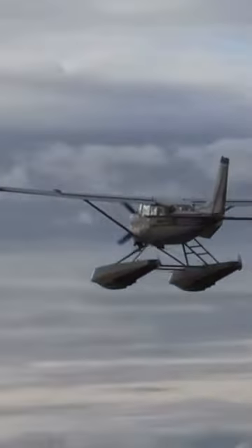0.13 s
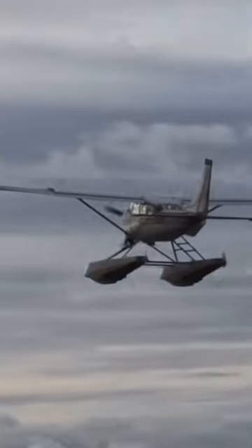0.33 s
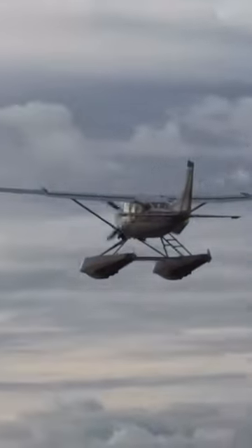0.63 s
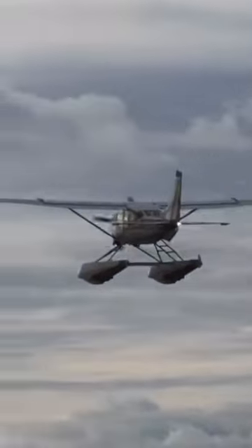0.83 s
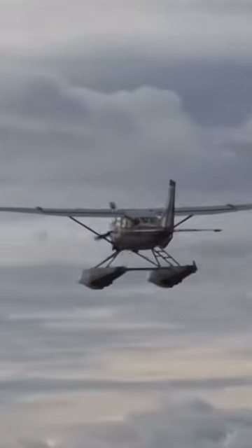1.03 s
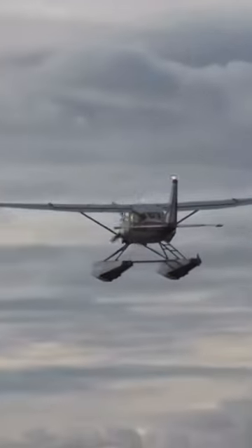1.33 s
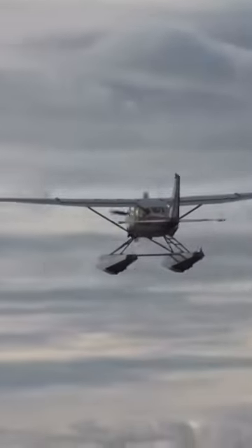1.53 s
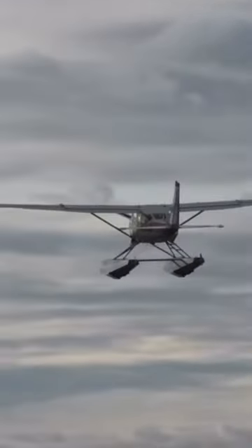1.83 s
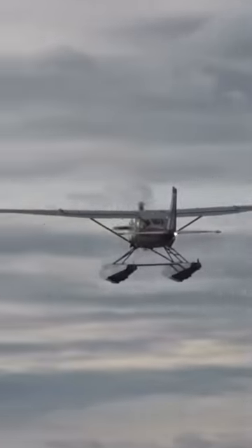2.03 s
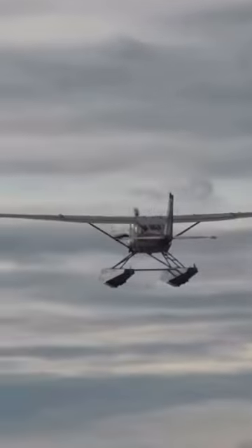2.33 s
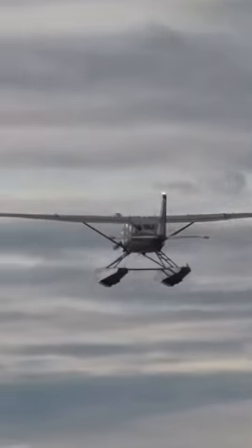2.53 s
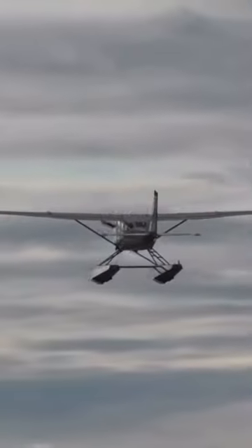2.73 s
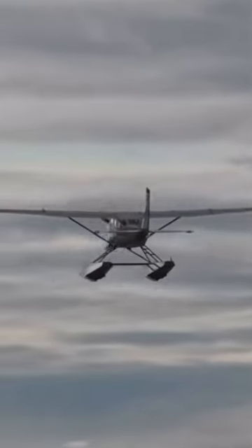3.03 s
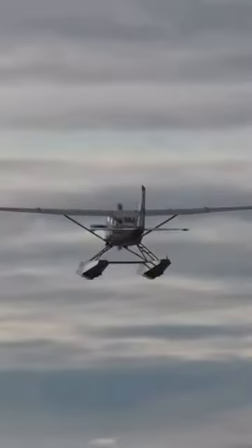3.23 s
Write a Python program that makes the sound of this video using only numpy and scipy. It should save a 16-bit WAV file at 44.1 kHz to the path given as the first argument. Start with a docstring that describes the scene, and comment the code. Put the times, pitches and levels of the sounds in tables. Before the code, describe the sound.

A small propeller plane flies away in the open air. At first close to the microphone, its piston engine barks with a metallic rasp; with distance the treble drops away, leaving a quieter pulsing hum and rushing air.

```python
"""Outdoors, one microphone, just after a float plane with a six-cylinder piston engine has passed.
Close at first, the exhaust booms at the firing rate; every second firing barks and throws a rasping
burst of gas, and propeller wash roars behind. In the first second a few firings crack harder.
Two metallic rings glide in the rasp as the plane turns away. Then distance dulls it all,
leaving mostly the throbbing boom and the wash over a faint hush."""
import sys
import numpy as np
from scipy import signal
from scipy.fft import rfft, irfft, next_fast_len
from scipy.io import wavfile
from scipy.ndimage import uniform_filter1d, map_coordinates

SR = 44100
rng = np.random.default_rng(int(sys.argv[2]) if len(sys.argv) > 2 else 0)


def materialize(psi):
    """Save the field psi as 16-bit PCM at rate SR to the path in sys.argv[1].

    A 1-D psi becomes a single channel; in a 2-D psi each row is a channel.
    """
    bounded = np.clip(np.atleast_2d(psi).T, -1, 1)
    quanta = np.round(bounded * 32767).astype(np.int16)
    wavfile.write(sys.argv[1], SR, quanta)


N = 149058
TIME = np.arange(N) / SR

# The cylinders in firing order. Each row: bark in dB, bark lag in firing intervals, rasp in dB.
CYLINDERS = [(-9, -0.069, -16), (-2, -0.031, 3), (-10.5, -0.0024, -8.5), (-3.5, -0.033, 2.5),
             (-2.5, -0.01, -9), (0.5, -0.034, 3.5)]


def amp(db):
    """Decibels to gain."""
    return 10 ** (np.asarray(db) / 20)


def unit(x):
    """Scale to rms 1."""
    return x / np.sqrt(np.mean(x ** 2) + 1e-20)


def curve(rows, column=1):
    """One column of a time table, per sample."""
    rows = np.array(rows)
    return np.interp(TIME, rows[:, 0], rows[:, column])


def wobble(rate):
    """A smooth random curve, rate knots a second."""
    return map_coordinates(rng.standard_normal(1024), [TIME * rate + 2], mode="wrap")


def along(points, hz):
    """Gain of (Hz, dB) points on a log axis."""
    f, db = np.transpose(points)
    return amp(np.interp(np.log(hz + 1), np.log(f + 1), db))


def filtered(x, response):
    """x through a frequency response."""
    size = 2 * next_fast_len(N // 2 + 8192)
    return irfft(rfft(x, size) * response(np.fft.rfftfreq(size, 1 / SR)), size)[:N]


def causal(gain):
    """The minimum-phase response with this gain."""
    cepstrum = irfft(np.log(np.maximum(gain, 1e-6)))
    half = len(cepstrum) // 2
    cepstrum[1:half] *= 2
    cepstrum[half + 1:] = 0
    return np.exp(rfft(cepstrum))


def resonance(f, hz, width_hz):
    """Causal band-pass response with gain 1 at its centre."""
    return 1j * f * width_hz / (hz ** 2 - f ** 2 + 1j * f * width_hz)


def gliding(x, hz, width_hz):
    """x through a resonance whose centre follows hz."""
    turn = np.exp(2j * np.pi * np.cumsum(hz) / SR)
    pole = np.exp(-np.pi * width_hz / SR)
    return 2 * np.real(turn * signal.lfilter([1 - pole], [1, -pole], x / turn))


def noise(spectrum, gate=1):
    """Gated, coloured noise of rms 1."""
    return unit(filtered(gate * rng.standard_normal(N), lambda hz: along(spectrum, hz)))


def patchy(x, depth_db, window, from_hz=700):
    """Random gain patches, mostly above from_hz: short windows colour bursts, long ones flutter."""
    hz, _, spectra = signal.stft(x, SR, nperseg=window)
    field = uniform_filter1d(rng.standard_normal(spectra.shape), size=4, axis=0)
    field = unit(uniform_filter1d(field, size=8, axis=1))
    gain = amp(depth_db * field * (hz / (hz + from_hz))[:, None])
    return signal.istft(spectra * gain, SR, nperseg=window)[1][:N]


def loudness(x):
    """Running level over about two firings."""
    return np.sqrt(np.abs(signal.fftconvolve(x ** 2, np.hanning(SR // 50), "same")) + 1e-12)


def firings(count):
    """Time in seconds and cylinder row of every firing."""
    k = np.arange(1, int(count[-1]))
    return np.interp(k, count, TIME), np.array(CYLINDERS)[k % len(CYLINDERS)]


def boom(count, fade_s=2.0):
    """The firing tone throbs as if beating, beside a narrow drone and the orders of unequal cylinders."""
    # The firing tone. Each row: time in seconds, relative level in dB.
    levels = [(0.0, -27.5), (0.03, -22), (0.13, -16), (0.2, -25), (0.24, -21), (0.32, -17.5), (0.38, -26),
              (0.41, -17), (0.46, -23), (0.5, -19.5), (0.55, -16.5), (0.59, -25.5), (0.74, -20),
              (0.78, -24), (0.87, -20.5), (1.04, -25), (1.18, -19.5), (1.22, -29), (1.26, -30.5),
              (1.3, -21), (1.46, -27.5), (1.51, -18), (1.54, -34.5), (1.58, -22.5), (1.78, -25.5),
              (1.82, -32), (1.84, -22.5), (1.96, -27), (2.04, -22), (2.15, -27), (2.16, -39.5),
              (2.2, -22.5), (2.27, -30), (2.31, -23.5), (2.4, -25), (2.44, -32.5), (2.48, -23),
              (2.57, -30.5), (2.62, -22), (2.67, -27), (2.77, -23.5), (2.83, -30), (2.89, -27),
              (3.13, -27.5), (3.17, -32), (3.23, -26.5), (3.33, -25), (3.38, -25.5)]
    # Engine orders. Each row: multiple of the six-firing cycle, level in dB close by, level in dB far off.
    orders = [(3, -38, -51.5), (5, -31, -38), (9, -44, -43.5), (10, -41.5, -50.5), (22, -32, -58.5),
              (25, -42, -57.5), (28, -39.5, -56), (31, -41, -67.5)]
    drone = unit(filtered(rng.standard_normal(N), lambda f: resonance(f, hz=149, width_hz=25) ** 2))
    envelope = uniform_filter1d(amp(curve(levels)), size=SR // 50)
    throb = np.exp(signal.hilbert(np.log(envelope)))  # each dip in level also bends the pitch
    tone = np.sqrt(2) * np.real(throb * np.exp(2j * np.pi * count))
    out = amp(-0.5) * tone + amp(-21) * envelope * drone
    nearness = np.exp(-TIME / fade_s)
    for order, near_db, far_db in orders:
        level_db = far_db + (near_db - far_db) * nearness
        cycles = order * count / len(CYLINDERS) + rng.random()
        out += amp(level_db) * np.sqrt(2) * np.cos(2 * np.pi * cycles)
    return out


def bark(count, lead_s=0.00021, jitter_s=0.000035, scatter_db=0.8, honk_fade_s=0.88):
    """A pressure pulse per firing rings the pipe; its honk fades as the tail turns to the microphone."""
    # The exhaust pipe's response. Each row: frequency in Hz, gain in dB.
    pipe_response = [(150, -38), (235, -24), (265, 1.5), (350, -10), (450, 10.5), (520, 1), (580, 5.5),
                     (650, -3.5), (715, -6), (770, -9.5), (830, -9.5), (900, -7.5), (960, -7.5),
                     (1150, -15), (2000, -22.5), (4500, -32.5), (12000, -91)]
    # The bark receding. Each row: time in seconds, relative level in dB.
    levels = [(0, -23), (.5, -23.5), (.8, -25.5), (1.15, -28), (1.5, -31.5), (2.1, -36), (2.7, -38),
              (3.38, -40)]
    times, cylinder = firings(count)
    chance = rng.standard_normal((len(times), 2))
    onsets = times - lead_s + cylinder[:, 1] * np.gradient(times) + jitter_s * chance[:, 0]
    strength = amp(cylinder[:, 0] + scatter_db * chance[:, 1])
    samples = np.clip(np.round(onsets * SR), 0, N).astype(int)
    pulses = np.bincount(samples, strength, N + 1)[:N]
    pipe = unit(filtered(pulses, lambda hz: causal(along(pipe_response, hz))))
    honk = filtered(pipe, lambda f: resonance(f, hz=662, width_hz=26))  # beamed sideways
    honk *= amp(1.5) * np.exp(-TIME / honk_fade_s)
    return amp(curve(levels) - 0.98) * (pipe + honk)


def gas_flow(count, lag_s=0.0028, rise_s=0.0017, fall_s=0.0012, scatter_db=0.8):
    """The envelope of the gas bursts: one follows each firing, as strong as its cylinder makes it."""
    # Firings that crack harder. Each row: time in seconds, extra level in dB.
    pops = [(.072, 3), (.198, 2), (.289, 1.5), (.6, 1.5), (.74, 3.5), (.773, 2.5), (.82, 4), (1.007, 6)]
    times, cylinder = firings(count)
    peaks = times + lag_s
    strength = amp(cylinder[:, 2] + scatter_db * rng.standard_normal(len(times)))
    for when, extra_db in pops:
        strength[np.argmin(np.abs(peaks - when))] *= amp(extra_db)
    bursts = np.bincount(np.round(peaks * SR).astype(int), strength, N)[:N]
    t = np.arange(-SR // 50, SR // 50 + 1) / SR
    shape = np.exp(-np.abs(t) / np.where(t < 0, rise_s, fall_s))
    return signal.fftconvolve(bursts, shape, "same")


def metallic_rings(gas):
    """Two resonances in the gas noise glide as the plane turns away."""
    # Each row: time in seconds, centre in Hz, gain in dB over the plain gas noise.
    low_ring = [(0, 2520, -1.5), (.25, 2640, 4.5), (.45, 2680, 6.5), (.62, 2290, -1.5), (.95, 2380, -6.5),
                (1.35, 2730, 7), (2.4, 2920, -6.5)]
    high_ring = [(0, 3210, 3), (.12, 3460, -7.5), (.23, 3590, 3.5), (.35, 3600, 10), (.48, 3500, -9.5),
                 (.8, 3320, -5), (1.02, 3630, 10.5), (1.3, 4060, -6)]
    return sum(amp(curve(ring, column=2)) * gliding(gas, curve(ring), width_hz=140)
               for ring in (low_ring, high_ring))


def rasp(count, stack_fade_s=0.6):
    """Bursts of turbulent gas ring the exhaust stack: the flow sets their energy, chance their colour."""
    # The gas noise. Each row: frequency in Hz, relative density in dB.
    gas_spectrum = [(250, -40), (450, 5.5), (750, -15.5), (1100, -10.5), (1500, -1), (2200, -0.5),
                    (3700, -4.5), (5000, -13.5), (7000, -20.5), (8400, -35), (10000, -39.5), (12000, -54),
                    (15000, -61)]
    # The rasp receding. Each row: time in seconds, level in dB.
    levels = [(0, -23.5), (.3, -25), (.6, -24), (.78, -29.5), (.93, -33.5), (1.15, -34), (1.7, -39.5),
              (2.2, -47.5), (3.38, -60.5)]
    flow = gas_flow(count)
    gas = noise(gas_spectrum, flow)
    stack = filtered(gas, lambda f: resonance(f, hz=1410, width_hz=330))  # heard from the side
    stack *= amp(1) * np.exp(-TIME / stack_fade_s)
    coloured = patchy(gas + stack + metallic_rings(gas), depth_db=1.4, window=256)
    return amp(curve(levels)) * unit(coloured * loudness(flow) / loudness(coloured))


def wash(count, chop=0.042, gust_db=0.35):
    """Propeller turbulence, chopped by two blades: four passes in six firings."""
    # The churned air. Each row: frequency in Hz, relative density in dB.
    air_spectrum = [(25, -28.5), (70, -5), (110, -1), (170, -3), (240, -4), (275, 3), (335, -2.5),
                    (430, -2), (800, -4), (1200, -5), (2000, -12), (3600, -11.5), (5200, -17), (7000, -27),
                    (8500, -37.5), (11500, -58.5)]
    # The wash receding. Each row: time in seconds, level in dB.
    levels = [(0, -24), (.6, -27), (1.15, -31), (1.8, -32.8), (2.5, -34.5), (3.38, -36.5)]
    blades = np.cos(2 * np.pi * count * 4 / len(CYLINDERS))
    return amp(curve(levels) + gust_db * wobble(7.3)) * noise(air_spectrum, 1 + chop * blades)


def through_air(x, treble_hz=5360, top_hz=11300, flutter_db=1.5):
    """Distance takes the treble, and moving air makes the upper bands flutter."""
    # Treble at the microphone. Each row: time in seconds, gain in dB at treble_hz.
    treble = [(0, 3), (.28, 4), (.42, 1), (.65, 0), (.85, 4), (1.1, 3), (1.4, -3), (1.9, -4), (2.5, -8),
              (3.38, -9.5)]
    hz, t, spectra = signal.stft(patchy(x, flutter_db, window=1024), SR, nperseg=256)
    band = 2 * hz ** 2 / (hz ** 2 + treble_hz ** 2) / (1 + (hz / top_hz) ** 12)
    gain = amp(band[:, None] * np.interp(t, *np.transpose(treble)))
    return signal.istft(spectra * gain, SR, nperseg=256)[1][:N]


def hush(level_db=-44.5):
    """The faint, steady noise of the open air around the microphone."""
    # Each row: frequency in Hz, relative density in dB.
    spectrum = [(20, -12), (60, -5), (300, 15.5), (3000, -6), (9000, -37.5), (15000, -35)]
    return amp(level_db) * noise(spectrum)


def scene():
    """The departing plane over the outdoor hush, the same in both channels."""
    # The engine's pace. Each row: time in seconds, firing rate in Hz as heard at the microphone.
    firing_rate = [(0, 128.9), (.4, 128.9), (1, 128.0), (1.5, 127.52), (3.38, 127.28)]
    count = np.cumsum(curve(firing_rate)) / SR  # firings so far
    plane = boom(count) + through_air(bark(count) + rasp(count) + wash(count))
    mono = plane + hush()
    return np.array([mono, mono])


def record(dry, top_hz=15400):
    """The microphone chain passes nothing above its band limit."""
    return np.array([filtered(side, lambda hz: hz < top_hz) for side in dry])


dry = scene()
out = record(dry)
materialize(out)
```